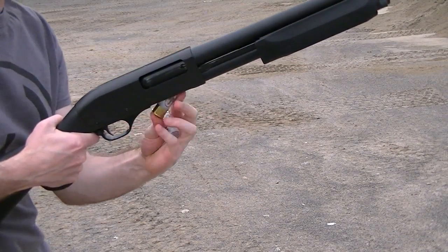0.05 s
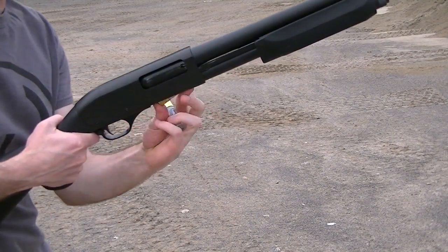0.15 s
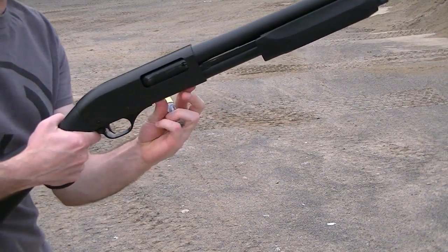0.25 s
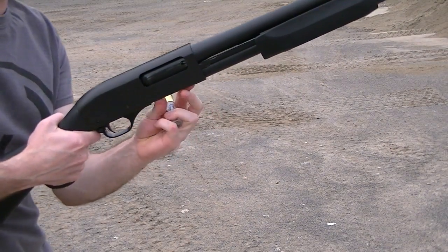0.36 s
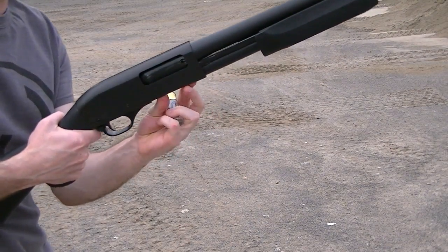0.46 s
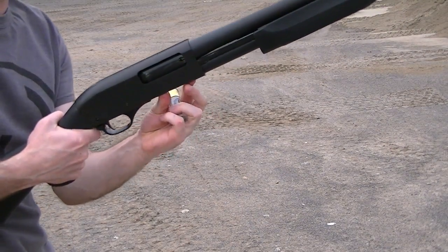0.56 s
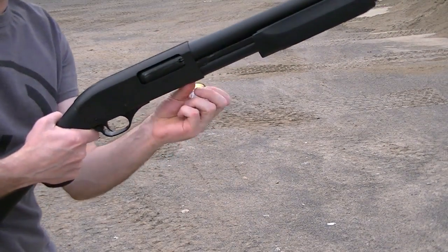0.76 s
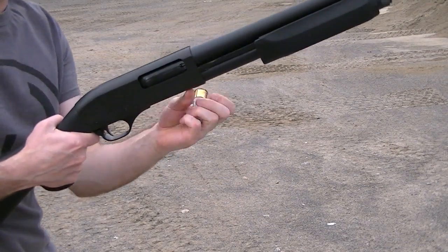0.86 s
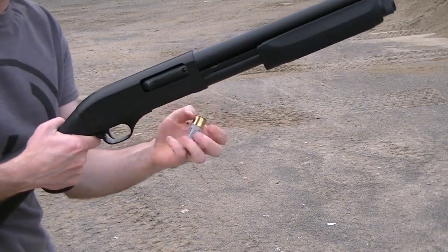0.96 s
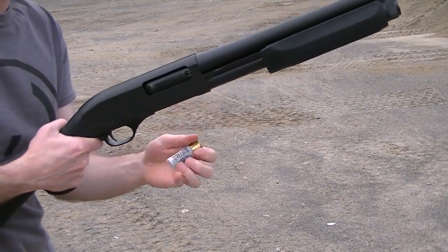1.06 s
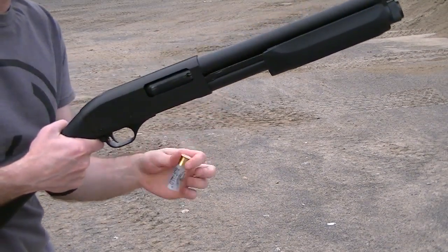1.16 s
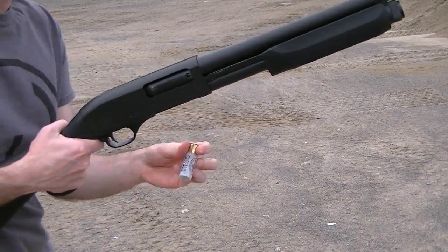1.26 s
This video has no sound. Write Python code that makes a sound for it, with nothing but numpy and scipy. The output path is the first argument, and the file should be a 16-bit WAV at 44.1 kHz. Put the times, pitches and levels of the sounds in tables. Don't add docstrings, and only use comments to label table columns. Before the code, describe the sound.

A shell is loaded into a pump-action shotgun, close and dry outdoors. A faint tick at the start, bright metal taps and clacks at 0.15, 0.2 and 0.27 seconds, another clack at 0.49. A squeaky scrape from 0.63 ends in the loudest rattling snap at 0.74. Springy clacks follow at 0.87 and 0.93, then quiet air hiss and a faint distant machine drone, with short gravel echoes.

```python
import sys
import numpy as np
from scipy import signal
from scipy.fft import rfft, irfft, next_fast_len
from scipy.io import wavfile
from scipy.ndimage import uniform_filter1d, map_coordinates

SR = 44100
rng = np.random.default_rng(int(sys.argv[2]) if len(sys.argv) > 2 else 0)


def level_to_linear(level):
    exponent = np.asarray(level, float) / 20
    return 10 ** exponent


def dump_mix(stems):
    frames = np.atleast_2d(stems).T
    limited = np.clip(frames, -1, 1)
    pcm = np.round(limited * 32767).astype(np.int16)
    wavfile.write(sys.argv[1], SR, pcm)


N = 57330


def unit(x):
    return x / np.sqrt(np.mean(x ** 2) + 1e-20)


def along(points, hz):
    f, v = np.transpose(points)
    return np.interp(np.log(hz + 1), np.log(f + 1), v)


def wobble(rate):
    knots = rng.standard_normal(2000)
    return map_coordinates(knots, [np.arange(N) * min(rate, 1500) / SR])


def filtered(x, response):
    m = next_fast_len(N + SR // 2)
    hz = np.fft.rfftfreq(m, 1 / SR)
    return irfft(rfft(x, m) * response(hz), m)[..., :N]


def open_air():
    # (frequency [Hz], level [dB per Hz])
    air_spectrum = [(15, -39), (25, -6), (338, -6), (431, -9), (684, -5.5), (1240, -12.5), (2880, -17.5),
                    (13500, -27.5), (16400, -37)]
    hiss = filtered(rng.standard_normal(N), lambda f: level_to_linear(along(air_spectrum, f)))
    return level_to_linear(-52.5 + 0.27 * wobble(2.6)) * unit(hiss)


def far_machine():
    # (frequency [Hz], level [dB])
    motor_tones = [(651, -62), (704, -63), (76, -69)]
    grows_db, sway_db, sways_per_s = 4.5, 2.5, 9
    t = np.arange(N) / SR
    drone = np.zeros(N)
    for hz, db in motor_tones:
        level_db = db + grows_db * t ** 2 + sway_db * wobble(sways_per_s)
        phase = 2 * np.pi * hz * t + .9 * wobble(14)
        drone += np.sqrt(2) * level_to_linear(level_db) * np.sin(phase)
    return drone


def ground(x):
    bounce_s, bounce_db = .0054, -14
    scatter_db, scatter_t60 = -17, .025
    t = np.arange(SR // 10) / SR
    scatter = rng.standard_normal(len(t)) * level_to_linear(-60 * t / scatter_t60)
    echo = level_to_linear(scatter_db) * scatter / np.linalg.norm(scatter)
    echo[0] += level_to_linear(bounce_db)
    return np.pad(signal.fftconvolve(x, echo), (round(bounce_s * SR), 0))[:N]


def rubbing(centre_hz):
    # (frequency [Hz], level [dB])
    grit_colour = [(300, -24.5), (700, -6), (2100, -3), (4000, -6.5), (6300, -6), (8500, -11.5),
                   (10500, -24.5), (16000, -19.5)]
    # (frequency [Hz], width [Hz])
    tube_modes = [(2100, 92), (3300, 330), (4700, 530), (5700, 68), (6400, 160), (7500, 530)]
    grit_db, slips_per_s, tube_db = 1.5, 300, -8
    rub_q, rub_peak_db, squeak_db = 1.8, 7, 2.5

    def tube(f):
        modes = sum(1j * f * w / (c * c - f * f + 1j * f * w) for c, w in tube_modes)
        return 1 + level_to_linear(tube_db) * modes

    grit = rng.standard_normal(N) * level_to_linear(grit_db * wobble(slips_per_s))
    rub = filtered(grit, lambda f: level_to_linear(along(grit_colour, f)) * tube(f))
    hz, t, z = signal.stft(rub, SR, nperseg=128)
    centre = np.interp(t, np.arange(N) / SR, centre_hz)
    octaves_off = np.log2((hz[:, None] + 1) / centre)
    z = z * level_to_linear(rub_peak_db / (1 + (rub_q * octaves_off) ** 2))
    squeaks = uniform_filter1d(rng.standard_normal(z.shape), size=2, axis=0)
    squeaks = uniform_filter1d(squeaks, size=4, axis=1)
    z = z * level_to_linear(squeak_db * unit(squeaks))
    y = signal.istft(z, SR, nperseg=128)[1][:N]
    return y / np.sqrt(np.abs(uniform_filter1d(y ** 2, size=3000)) + 1e-20)


def scrapes():
    # (time [s], level [dB], rub centre [Hz])
    push = [
        (.6, -62.5, 5360),
        (0.635, -39.5, 5470),
        (0.646, -31, 5950),
        (0.668, -36.5, 5500),
        (0.697, -33, 6000),
        (.702, -38, 6500),
        (.708, -35, 7500),
        (.72, -33, 7000),
        (0.739, -39, 5940),
    ]
    # (start [s], length [s], start level [dB], end level [dB], rub centre [Hz])
    drags = [
        (.186, .01, -56, -42, 5060),
        (.234, .032, -47, -44, 2600),
        (.27, .019, -36, -47, 5000),
        (.326, .02, -55, -47, 5100),
        (.473, .018, -58, -36, 5300),
        (.862, .0127, -53, -24, 6500),
        (.9162, .01, -33, -35, 6200),
    ]
    t = np.arange(N) / SR
    s, db, hz = np.transpose(push)
    level = level_to_linear(np.interp(t, s, db, left=-120, right=-120))
    centre = np.interp(t, s, hz)
    for s, length, start_db, end_db, hz in drags:
        level = level + level_to_linear(np.interp(t, [s, s + length], [start_db, end_db], left=-120, right=-120))
        centre = np.where((t > s - .003) & (t < s + length + .003), hz, centre)
    return uniform_filter1d(level, size=30) * rubbing(centre)


def squeals():
    # (middle [s], peak level [dB], frequency [Hz], half length [s])
    binds = [(.6395, -21, 5850, .0014), (.6425, -28, 6050, .001), (.6475, -29, 5000, .002),
             (.649, -28, 6200, .003), (.652, -29, 6600, .0015), (.656, -26, 5400, .0015),
             (.661, -34, 3300, .003), (.682, -30, 5150, .0015), (.681, -36, 3300, .003),
             (.687, -32, 5200, .002), (.692, -29, 6200, .003), (.697, -28, 6700, .003),
             (.6955, -31, 2050, .0025), (.7075, -29, 6700, .002), (.712, -32, 4700, .002),
             (.708, -34, 8800, .0015), (.714, -34, 9500, .003), (.7155, -33, 7200, .002),
             (.4885, -31, 5200, .002)]
    t = np.arange(N) / SR
    out = np.zeros(N)
    for s, db, hz, half_s in binds:
        swell = np.exp(-((t - s) / half_s) ** 2)
        out += level_to_linear(db) * swell * np.sin(2 * np.pi * hz * (t - s))
    return out


def struck_mode(after, hz):
    return np.sin(2 * np.pi * hz * after) * (1 - np.exp(-after * hz * 3))


def knocks():
    # (time [s], peak level [dB], frequency [Hz], decay t60 [s])
    thumps = [(.149, -33, 910, .022), (.196, -27, 870, .016), (.2768, -22, 830, .016),
              (.278, -25, 450, .014), (.2785, -27, 300, .018), (.2672, -30, 900, .014),
              (.339, -39.5, 280, .059), (.491, -31, 1320, .022), (.4925, -34, 940, .025),
              (.5651, -19, 135, .012), (.5651, -29, 300, .012), (.8748, -14, 900, .011),
              (.875, -21, 1410, .022), (.8765, -30, 580, .015), (.879, -28, 334, .075),
              (.927, -26, 885, .033), (.196, -40, 300, .04), (.743, -33, 500, .02), (.742, -27, 750, .015),
              (.238, -42, 3000, .05), (.245, -44, 2100, .05), (.24, -42, 1230, .04)]
    t = np.arange(N) / SR
    out = np.zeros(N)
    for s, db, hz, t60 in thumps:
        after = np.clip(t - s, 0, None)
        out += level_to_linear(db - 60 * after / t60) * struck_mode(after, hz)
    return out


def pings():
    # (time [s], peak level [dB], frequency [Hz], touch [s])
    steel_modes = [(.0054, -31, 4670, .0022), (.0054, -36, 5800, .0012), (.0056, -43, 8200, .002),
                   (.0056, -42, 2000, .003), (.1961, -18, 5630, .0022), (.1961, -21, 3390, .0013),
                   (.1963, -26, 2170, .003), (.1962, -27, 7550, .0015), (.2661, -18, 4150, .002),
                   (.2661, -20, 6600, .002), (.2755, -31, 2050, .002), (.2762, -22, 5000, .0017),
                   (.3162, -34, 7200, .002), (.1483, -24, 5690, .003), (.1483, -24, 6590, .003),
                   (.1483, -25, 7720, .002), (.1493, -24, 4360, .0022), (.4909, -18, 5530, .0022),
                   (.4909, -23, 4340, .0025), (.4909, -24, 6520, .002), (.492, -30, 2070, .003),
                   (.5022, -33, 7600, .0015), (.5022, -42, 13900, .0015), (.8503, -34, 4900, .002),
                   (.9264, -27, 2780, .002), (.9266, -27, 1820, .003), (.9265, -29, 6270, .006),
                   (.9268, -28, 4510, .003), (.9266, -29, 3430, .002), (.8747, -21, 6900, .004),
                   (.8747, -22, 5020, .003), (.875, -23, 2030, .003), (.8748, -26, 2990, .003),
                   (.8735, -31, 13000, .003), (.8833, -21, 7000, .0015), (.8892, -24, 7600, .0015),
                   (.7221, -23, 2200, .0025), (.7221, -24, 6500, .002), (.7422, -17, 11320, .0045),
                   (.7422, -20, 13050, .004), (.7422, -26, 15000, .004), (.7415, -15, 1870, .003),
                   (.743, -13, 5060, .003), (.7426, -12, 7750, .0018), (.7392, -14, 8100, .0014),
                   (.7392, -14, 6200, .0014), (.7432, -15, 6300, .002), (.7422, -16, 2940, .003),
                   (.7435, -21, 2250, .003)]
    t = np.arange(N) / SR
    out = np.zeros(N)
    for s, db, hz, touch_s in steel_modes:
        after = np.clip(t - s, 0, None)
        out += level_to_linear(db) * np.exp(-(after / touch_s) ** 2) * struck_mode(after, hz)
    return out


def strikes(rows, part):
    mode_count, spread_db, treble_from_hz = 40, 10, 9800
    tail_db, tail_t60, rise_s = -7, .028, .0001
    in_step = .4
    bass_cut_hz = 484
    out, t = np.zeros(N + SR), np.arange(SR // 20) / SR
    for s, db, tilt_db, touch_s, treble_db in rows:
        place, spread, phase = rng.random((3, mode_count, 1))
        hz = 700 + (np.arange(mode_count)[:, None] + place) * 15500 / mode_count
        gain_db = along(part, hz) + tilt_db * np.log2(hz / 5000)
        gain_db = gain_db + treble_db * (hz > treble_from_hz) + spread_db * spread
        modes = level_to_linear(gain_db) * np.sin(2 * np.pi * (hz * t + in_step * phase))
        touching = np.exp(-(t / np.clip(touch_s, .0005, .005)) ** 2)
        tail = level_to_linear(tail_db - 60 * t / tail_t60)
        hit = np.sum(modes, axis=0) * (touching + tail) * (1 - np.exp(-t / rise_s))
        out[round(s * SR):][:len(t)] += level_to_linear(db) * hit / np.abs(hit).max()
    return filtered(out[:N], lambda f: (1j * f / (bass_cut_hz + 1j * f)) ** 2)


def rim_taps():
    # (time [s], peak level [dB], tilt [dB per octave], touch [s], treble [dB])
    taps = [
        (.0054, -37, -2, .0015, -4),
        (.1483, -15.5, -2, .0028, 4),
        (.2661, -14, -2, .0012, 3),
        (.3095, -39, -3, .001, -15),
        (.3155, -33, -4, .003, -2),
        (.3298, -48, 0, .001, -6),
        (.3405, -39, -2, .002, -9),
        (.5022, -32, 1, .002, 0),
        (1.272, -47, 6, .002, 0),
        (.1568, -30, 2, .001, -8),
    ]
    # (frequency [Hz], level [dB])
    brass = [(410, -38), (700, -29), (3160, -3.5), (4150, -15.5), (5260, 0.5), (6480, -0.5), (14400, -20),
             (16000, -21)]
    return strikes(taps, brass)


def lifter_clacks():
    # (time [s], peak level [dB], tilt [dB per octave], touch [s], treble [dB])
    clacks = [
        (.1961, -17, -1, .002, -2),
        (.4908, -22, 1, .003, 0),
        (.5656, -43, -5, .003, -3),
        (.8503, -29, -2, .002, -12),
        (.2765, -25, 0, .0015, -9),
        (.9263, -9, 1, .0005, -2),
        (.9272, -22, -1, .003, -6),
        (.1929, -28, -1, .002, -6),
    ]
    # (frequency [Hz], level [dB])
    plate = [(410, -37), (700, -5.5), (1970, -4.5), (3840, -5.5), (5610, -4.5), (10900, -22), (13100, -31),
             (16000, -49)]
    return strikes(clacks, plate)


def lifter_bounces():
    # (time [s], peak level [dB], tilt [dB per octave], touch [s], treble [dB])
    landings = [
        (.8746, -10, 1, .003, 6),
        (.8795, -17, 3, .003, 0),
        (.8832, -16, 3, .002, -6),
        (.889, -26, 1, .003, 0),
    ]
    # (frequency [Hz], level [dB])
    sprung_plate = [(410, -36), (700, -11.5), (2960, -1.5), (3990, -13.5), (4380, -1.5), (7110, 1),
                    (14600, -30), (16000, -8.5)]
    return strikes(landings, sprung_plate)


def stop_snaps():
    # (time [s], peak level [dB], tilt [dB per octave], touch [s], treble [dB])
    snaps = [
        (.7219, -17, -1, .0025, -10),
        (.7272, -19, 0, .0025, -16),
        (.7392, -7, -1, .0014, -24),
        (.7421, -2.5, -.5, .003, -10),
        (.7408, -14, 0, .001, -16),
        (.7449, -9, 0, .0015, -10),
        (.7471, -8, 0, .002, -10),
        (.7505, -15, 1, .003, -10),
        (.7368, -19, 1, .002, -8),
    ]
    # (frequency [Hz], level [dB])
    stop_spring = [(410, -45), (700, -21.5), (1800, -2.5), (3000, -6.5), (5060, 1), (8000, 0.5),
                   (9800, -15), (16000, -6)]
    return strikes(snaps, stop_spring)


def scene():
    clicks = rim_taps() + lifter_clacks() + lifter_bounces() + stop_snaps()
    gun = scrapes() + squeals() + knocks() + pings() + clicks
    return (open_air() + far_machine() + ground(gun) + gun)[None]


def gain_control(x):
    from_db, share, back_s = -22, .6, .2
    level_db = 10 * np.log10(np.abs(uniform_filter1d(x[0] ** 2, size=220)) + 1e-12)
    over_db = np.clip(level_db - from_db, 0, None)
    t = np.arange(N) / SR / back_s
    held_db = np.exp(np.maximum.accumulate(np.log(over_db + 1e-6) + t) - t)
    return x * level_to_linear(-share * uniform_filter1d(held_db, size=600, origin=290))


def band_limit(hz):
    top_hz, bottom_hz = 15750, 54
    return 1 / (1 + (hz / top_hz) ** 90) * hz ** 2 / (hz ** 2 + bottom_hz ** 2)


def roll_off(x):
    return signal.sosfilt(signal.butter(12, 16500, fs=SR, output="sos"), x)


def record(dry):
    mix = filtered(gain_control(dry), band_limit)
    return roll_off(mix)


dry = scene()
out = record(dry)
dump_mix(out)
```